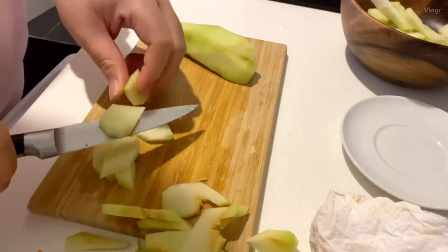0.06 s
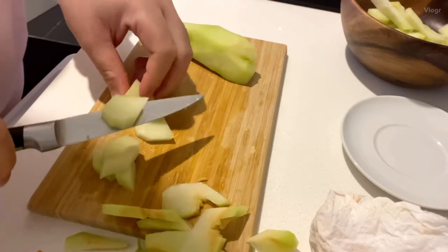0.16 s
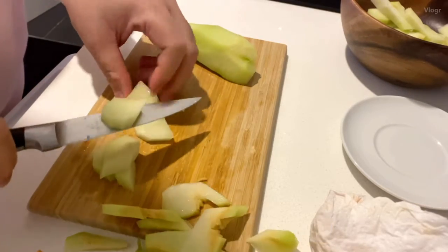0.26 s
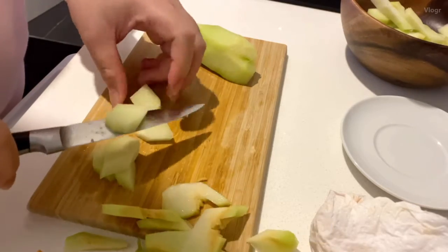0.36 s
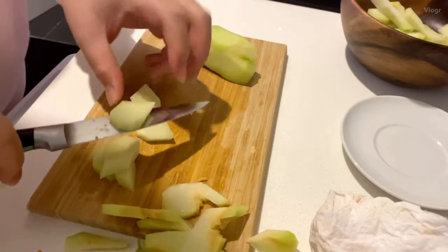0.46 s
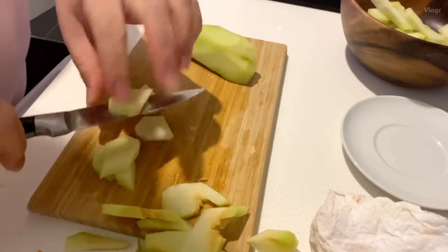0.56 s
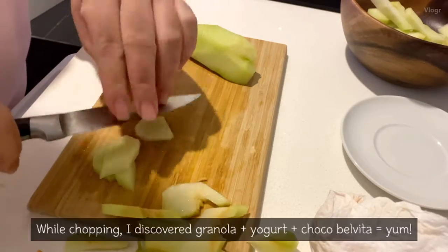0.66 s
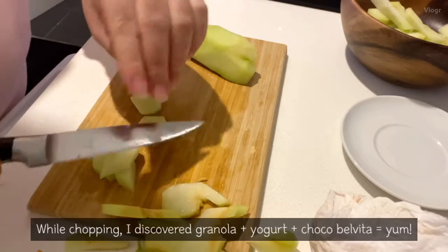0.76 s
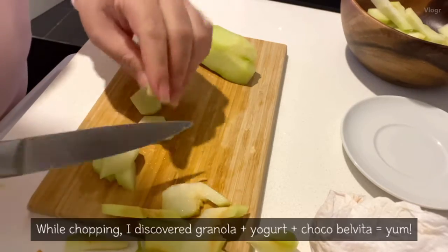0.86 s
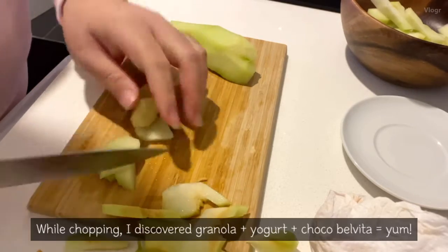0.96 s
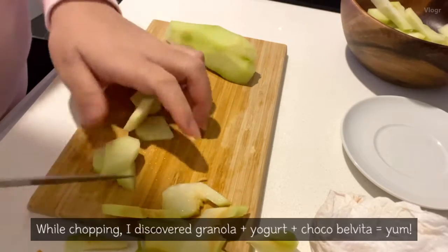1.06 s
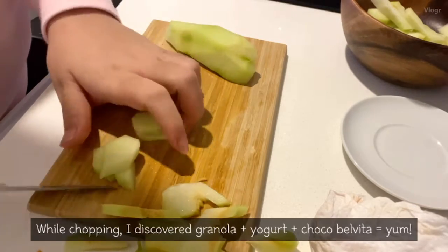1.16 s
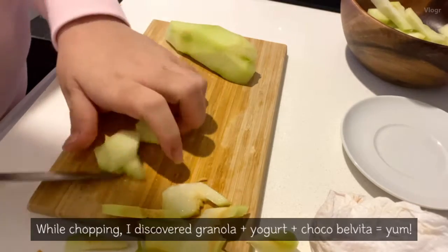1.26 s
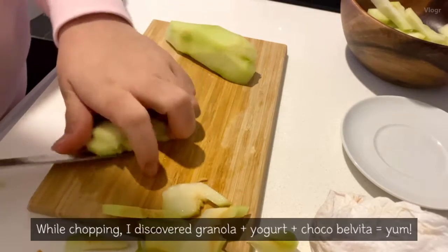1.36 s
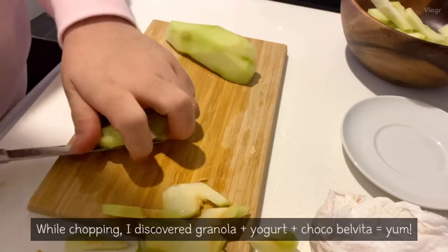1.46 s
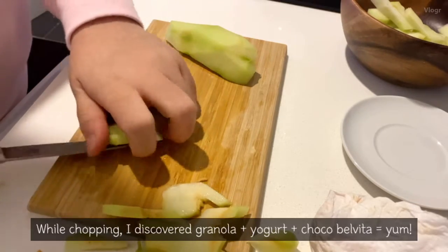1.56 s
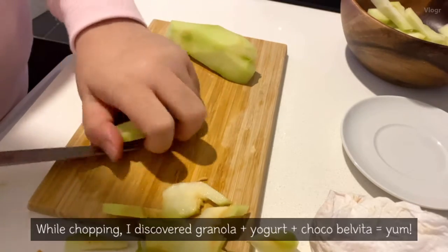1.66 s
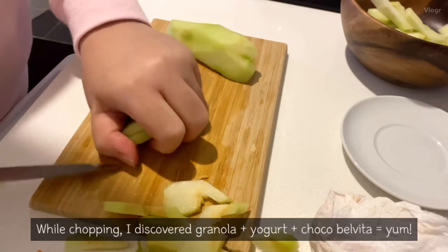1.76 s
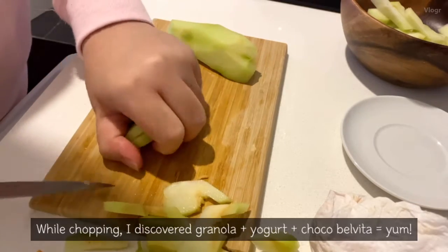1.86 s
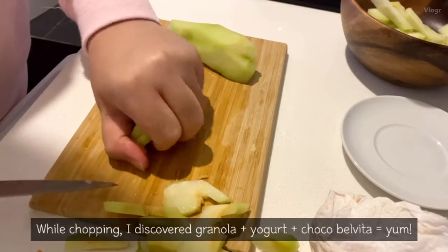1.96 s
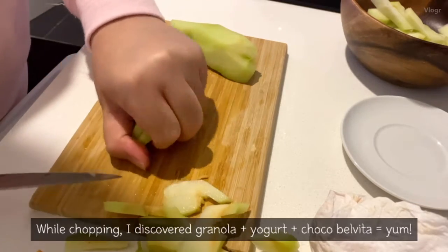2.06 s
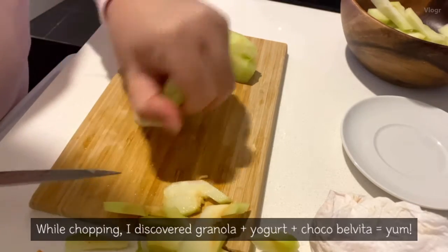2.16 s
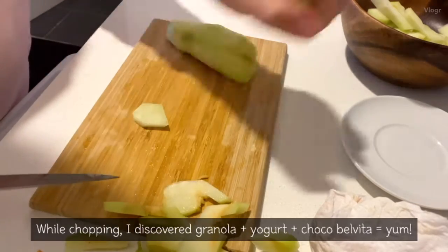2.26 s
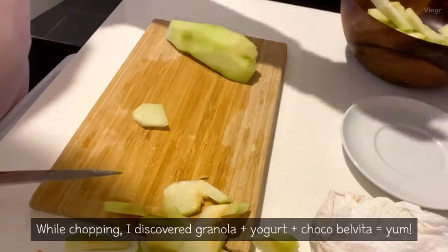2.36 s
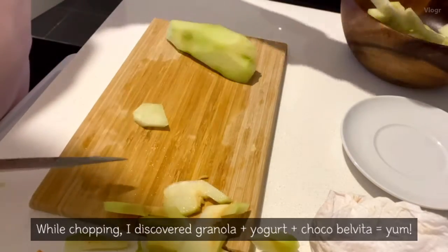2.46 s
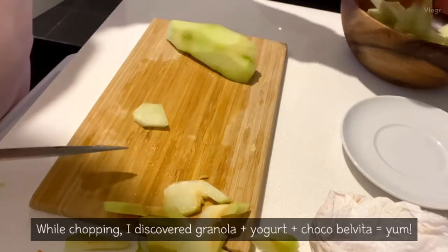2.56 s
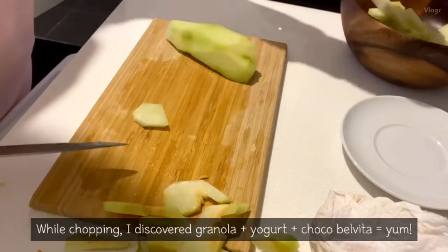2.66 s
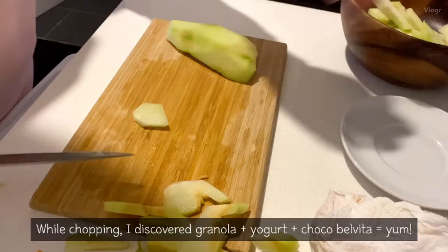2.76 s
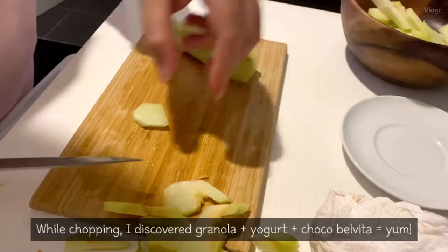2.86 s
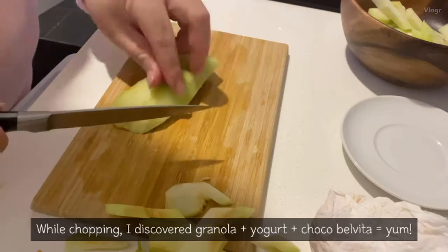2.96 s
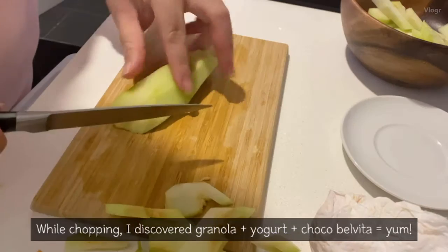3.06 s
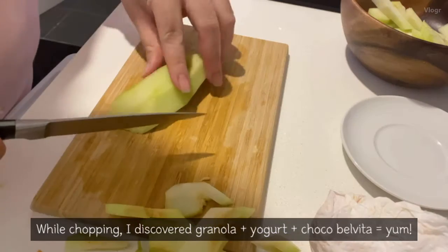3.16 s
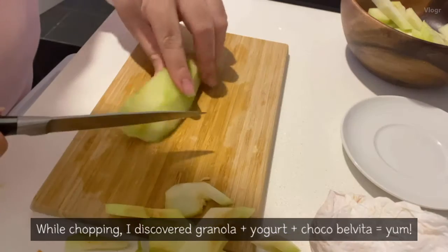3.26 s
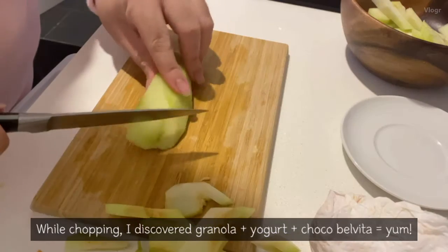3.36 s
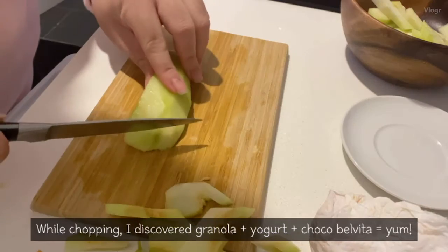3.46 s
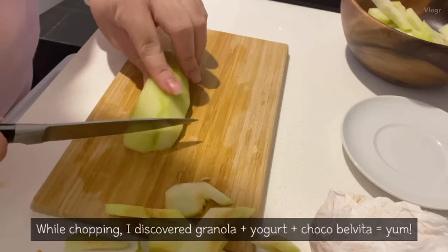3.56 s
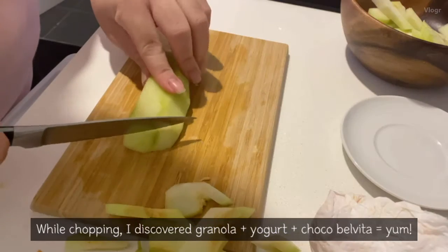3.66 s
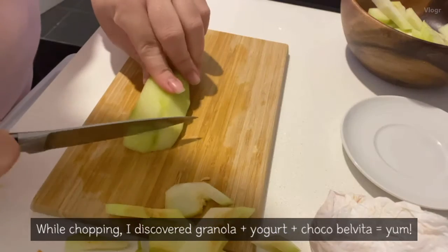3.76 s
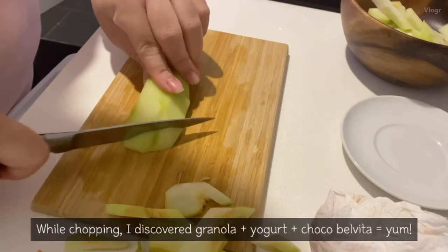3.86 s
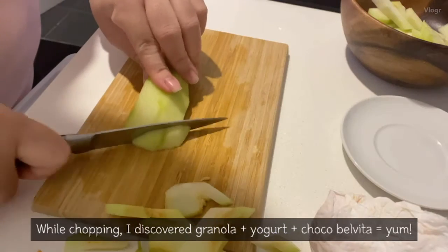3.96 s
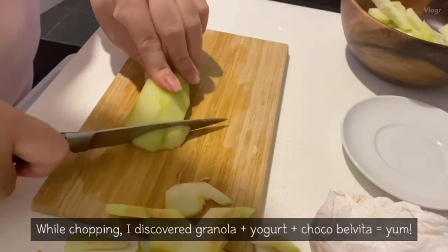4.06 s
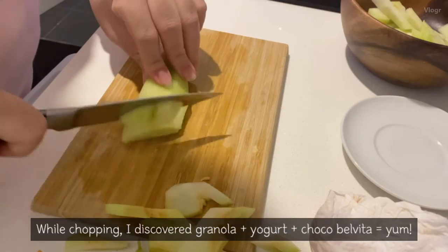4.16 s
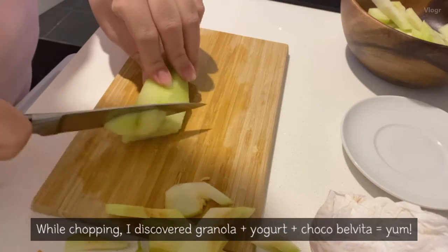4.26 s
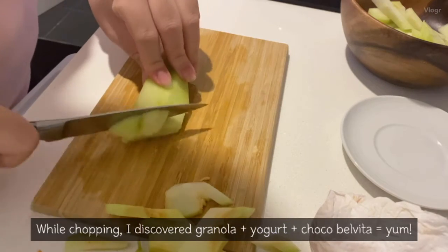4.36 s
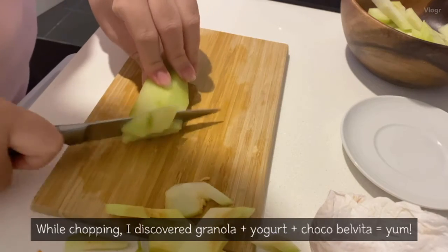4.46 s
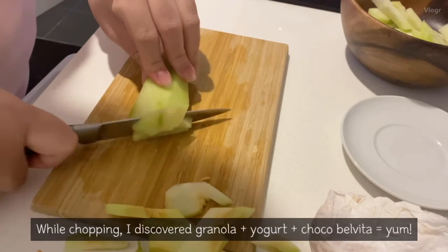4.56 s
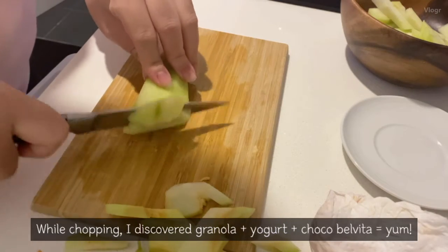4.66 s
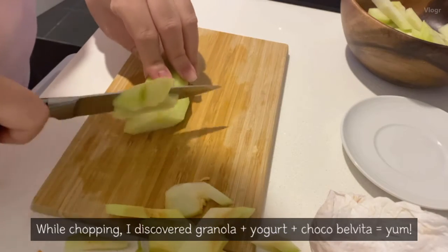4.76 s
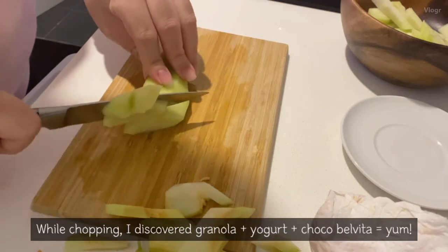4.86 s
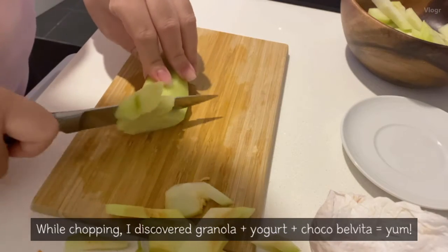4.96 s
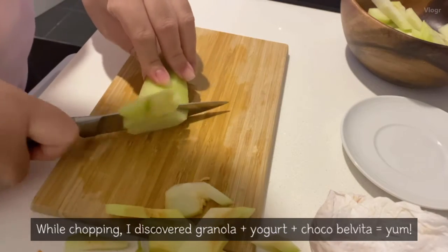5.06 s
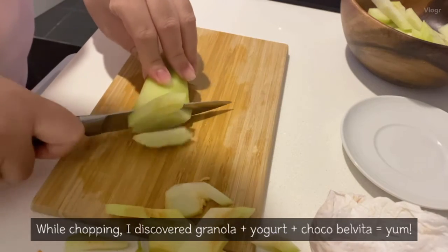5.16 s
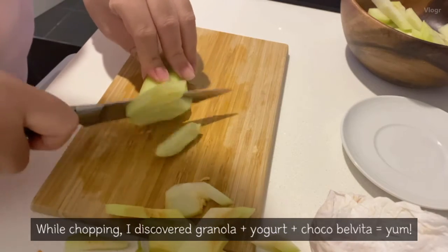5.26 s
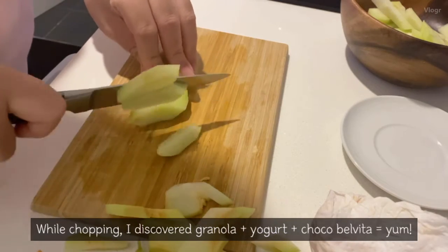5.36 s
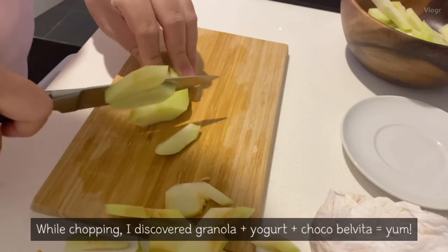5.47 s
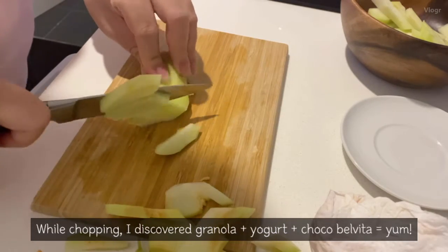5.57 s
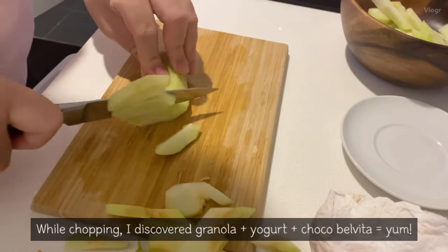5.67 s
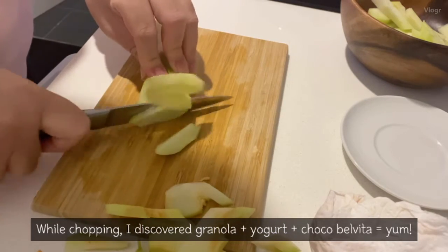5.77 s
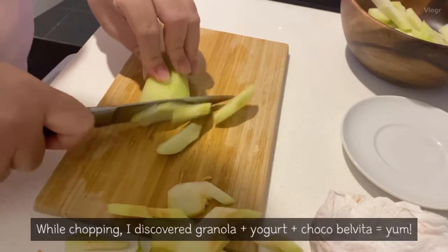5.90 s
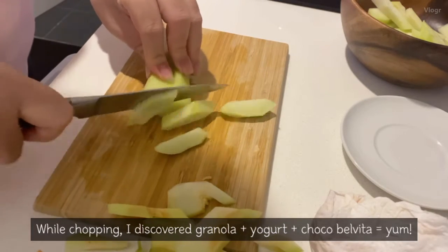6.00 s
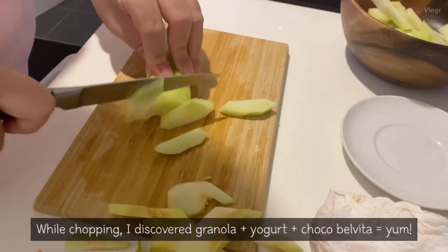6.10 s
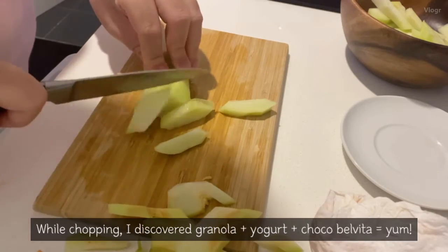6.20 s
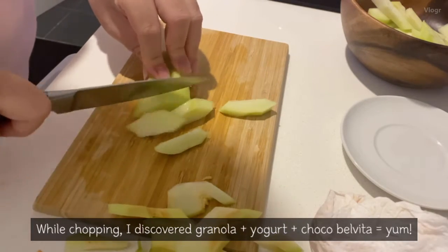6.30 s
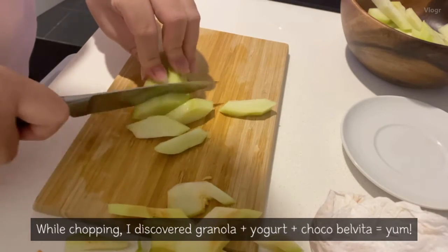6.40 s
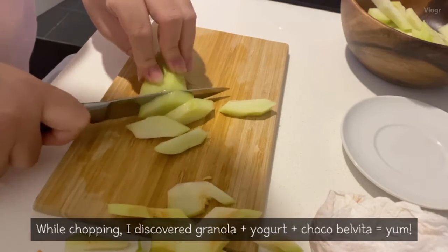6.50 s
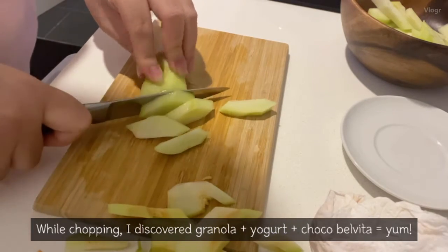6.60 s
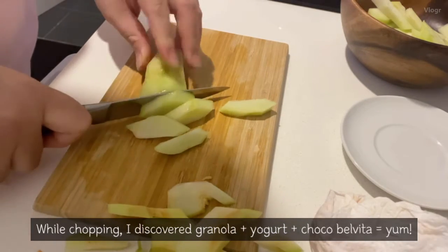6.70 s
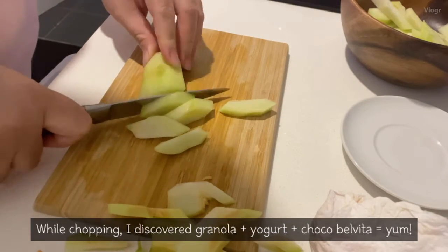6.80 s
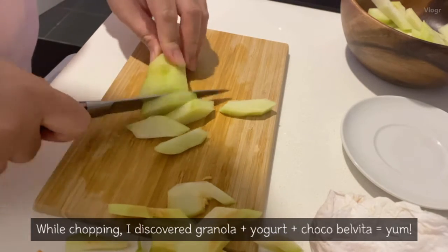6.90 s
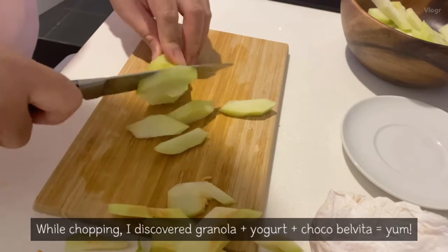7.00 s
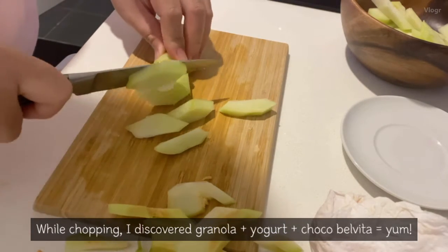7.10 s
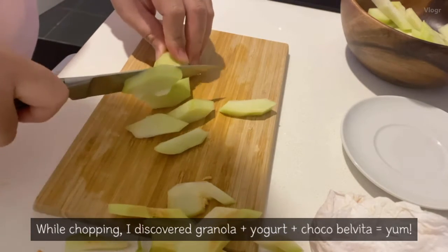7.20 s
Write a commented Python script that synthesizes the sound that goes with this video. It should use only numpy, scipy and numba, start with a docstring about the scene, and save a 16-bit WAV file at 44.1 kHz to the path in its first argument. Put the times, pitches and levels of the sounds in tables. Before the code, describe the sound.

Nearly three seconds of quiet handling, with moist rustles, finger and blade ticks and gentle board knocks, give way to slicing. Five bright, hard knife strikes on bamboo follow, the first loudest, each preceded by a brief juicy crunch and often a dull board thump. Small pieces tap and slide in between. Close microphones, short kitchen reverberation, low house hum and thin air noise.

```python
"""Slicing squash in a small kitchen

A knife slices firm squash on a bamboo board; hands move the wet pieces between cuts.
Each cut is a thump of the board, a crunchy slide and a chop: forces excite damped modes, and friction
is filtered crackle. Hard walls answer with decaying noise, over a low hum, a motor and thin air noise.
Two microphone ports hear the board with different phase and level at each pitch."""
import sys
import numpy as np
from scipy import signal
from scipy.fft import rfft, irfft
from scipy.io import wavfile
from scipy.ndimage import uniform_filter1d
from numba import njit

SR = 44100
rng = np.random.default_rng(int(sys.argv[2]) if len(sys.argv) > 2 else 0)


def persist_wave(psi):
    """Save psi, clipped to +-1, as 16-bit WAV."""
    counts = np.round(np.clip(psi, -1, 1) * 32767).astype(np.int16)
    wavfile.write(sys.argv[1], SR, np.atleast_2d(counts).T)


N = 319284  # samples


def undb(db):
    """Level: amplitude ratio of a value in dB."""
    return 10 ** (np.asarray(db) / 20)


def unit(x):
    """Normalization: scale to an effective (RMS) value of 1."""
    return x / np.sqrt(np.mean(x ** 2))


def band(x, lo_hz, hi_hz):
    """Band-pass filtering between two corner frequencies."""
    sos = signal.butter(2, [lo_hz, min(hi_hz, .49 * SR)], "band", fs=SR, output="sos")
    return signal.sosfilt(sos, x)


@njit
def svf(x, hz, k):
    """Resonance: state-variable band-pass with a moving centre and relative width k."""
    y, b, l = np.empty(len(x)), 0., 0.
    for i in range(len(x)):
        g = np.tan(np.pi * hz[i] / SR)
        v = (b + g * (x[i] - l)) / (1 + g * (g + k))
        b, l, y[i] = 2 * v - b, l + 2 * g * v, k * v
    return y


def ring(hz, t60, length=.25):
    """Free vibration: one mode decays exponentially, by 60 dB in t60 s."""
    t = np.arange(int(length * SR)) / SR
    return np.sin(2 * np.pi * hz * t) * np.exp(-np.log(1000) * t / max(t60, .003))


def thud(hz, t60, push=.022):
    """Forced vibration: a soft push lasting push s drives one low mode; peak 1."""
    n = int(push * SR)
    force = np.hanning(n) * np.sin(2 * np.pi * hz * np.arange(n) / SR)
    x = np.convolve(ring(hz, t60), force)
    return x / np.abs(x).max()


def burst(decay):
    """Random excitation: noise that falls to 1/e in decay s."""
    t = np.arange(int(.12 * SR)) / SR
    return rng.standard_normal(len(t)) * np.exp(-t / decay)


def crackle(rate, scatter_db, hiss):
    """Shot noise: cells burst as clicks of uneven size, rate per s, over a fine hiss."""
    size = undb(scatter_db * rng.standard_normal(N)) * rng.standard_normal(N)
    clicks = size * (rng.random(N) < rate / SR)
    return unit(clicks) + hiss * rng.standard_normal(N)


def walk(rate):
    """Random modulation: levels held 1 / rate s and smoothed twice; spread near 1."""
    hold = int(SR / rate)
    steps = np.repeat(rng.standard_normal(N // hold + 1), hold)
    return 1.3 * uniform_filter1d(uniform_filter1d(steps, hold), hold)[:N]


def span(start, length, fade):
    """Envelope: a gate that opens and closes linearly over fade s."""
    t = np.arange(N) / SR
    return np.clip(np.minimum(t - start, start + length + fade - t) / fade, 0, 1)


def add(out, s, x):
    """Superposition: add x to out from time s on."""
    i = int(s * SR)
    x = x[..., :out.shape[-1] - i]
    out[..., i:i + x.shape[-1]] += x


# Blade landing on the board: t/s, peak level/dB, brightness/(dB per octave),
# second contact level/dB, counter thud level/dB
BLADE_LANDINGS = [(3.818, -0.5, 5.6, 3, -17), (4.392, -4.5, -1.7, -1.5, -18), (4.967, -10.5, -5.8, -1, -15),
                  (5.688, -8, -0.3, 4, -14), (6.384, -6.5, 1.5, 0, -14)]
# Modes of the board: f/Hz, relative level/dB, t60/s
BOARD_MODES = [(467, -11, .06), (760, -10, 0.025), (995, -18.5, .03), (1150, -5, .025), (1330, -4, 0.013),
               (1448, -12.5, 0.041), (1585, -4, 0.035), (1768, -11, .025), (1870, 5, .04), (2133, 0, 0.051),
               (2332, -3.5, 0.047), (2492, -1, .02), (2764, -14, .03), (3020, -11, 0.046),
               (3294, -13.5, 0.046), (3630, -5.5, 0.014), (3800, -7, 0.025), (4070, -11.5, 0.018),
               (4423, -17.5, 0.0088), (5494, -17, .012), (5787, -18, 0.007), (6830, -19.5, .01)]
SECOND_CONTACT_S = 0.0026  # belly lands this long after the heel
COUNTER_HZ, COUNTER_DB = 255, -3  # second mode of the counter thud


def chops():
    """Modal excitation: heel and belly strike the board in turn; also the bare knock the walls hear."""
    out, knocks = np.zeros(N), np.zeros(N)
    for s, db, tilt_db, second_db, thud_db in BLADE_LANDINGS:
        force = 0.042 * burst(0.0084)
        force[0] += 1
        force[int(SECOND_CONTACT_S * SR)] += undb(second_db)

        # each blow scatters the modes a little in level and pitch
        scatter = 2.5 * rng.standard_normal((len(BOARD_MODES), 2))
        modes = 0
        for k, ((f, g, t60), (a, b)) in enumerate(zip(BOARD_MODES, scatter)):
            level = undb(g + tilt_db * np.log2(max(f, 1000) / 2000) + a)
            modes = modes + level * (-1) ** k * ring(f * (1 + .003 * b), t60, length=0.18)
        blow = signal.fftconvolve(force, modes)
        blow /= np.abs(blow).max()

        # the many dense modes between the strong ones blur into a knock
        click = signal.unit_impulse(2000)
        knock = band(click, 1650, 2500) - undb(-8) * band(click, 1200, 1600)
        knock += undb(-16) * band(click, 340, 1500)
        knock -= undb(-5.5 + tilt_db) * band(click, 3300, 4500)
        knock += undb(-11 + tilt_db / 2) * band(click, 5200, 7200)
        knock -= undb(-26) * band(click, 8000, 15000)
        knock /= np.abs(knock).max()

        add(blow, 0, undb(-4.0) * signal.fftconvolve(force, knock))
        add(blow, .005, undb(thud_db) * thud(155, 0.066, push=0.0072))
        add(blow, .005, undb(thud_db + COUNTER_DB) * thud(COUNTER_HZ, 0.05, push=0.004))
        add(out, s + .001, undb(db) * blow / np.abs(blow).max())
        add(knocks, s, undb(db) * knock)
    return out, knocks


# Bands in which the blade sings faintly: f/Hz, width/Hz, relative level/dB
BLADE_SONG = [(3260, 150, -3.5), (3900, 90, -7), (4800, 170, -0.5), (5220, 150, -5), (6300, 410, -12),
              (7140, 150, 1), (11500, 2700, -6.5)]


def blade_bands(x):
    """Parallel resonances: the blade's bands come and go as its grip changes."""
    total = 0
    for f, width, g in BLADE_SONG:
        level = undb(g + 3 * walk(12))
        total = total + level * unit(svf(x, np.full(N, 1. * f), width / f))
    return unit(total)


def board_noise(x):
    """Structure-borne sound: friction heard through the lower modes of the board."""
    total = 2.0 * unit(band(x, 460, 3400))
    for f, g, _ in BOARD_MODES[:10]:
        level = undb(g / 2 + 2.4 * walk(12))
        total = total + level * unit(svf(x, np.full(N, 1. * f), 0.055))
    return unit(total)


# Blade through the flesh: edge touches t/s, enters t/s, skin snaps t/s, flesh parts t/s, graze level/dB,
# steady crunch level/dB, snap level/dB, last tear level/dB, board rumble re steady crunch level/dB
CUTS = [(3.59, 3.648, 3.704, 3.816, -59, -54, -47, -42, -4),
        (4.185, 4.243, 4.28, 4.39, -65, -50.5, -41, -35, -4),
        (4.728, 4.792, 4.803, 4.964, -63, -51, -49, -39, -3),
        (5.435, 5.49, 5.64, 5.686, -70, -56, -54, -37, -1),
        (6.15, 6.245, 6.258, 6.383, -59, -56, -56, -39, -3),
        (7.09, 7.148, 7.22, 7.3, -74, -61, -54, -50, -7)]
ENTER_S, LET_GO_S = .012, .018  # the crunch builds; the halves slide off the blade
GRAZE_RISE_DB_PER_S, SNAP_RISE_S, SNAP_FALL_S = 170, .007, .014
TEAR_S, TEAR_RUMBLE_DB = .017, -13  # swell before the flesh parts; its rumble in the board
CRUNCH_FIZZ_DB, TEAR_FIZZ_DB = -1, -5  # fizz near and above 9 kHz


def slices():
    """Fracture noise: crisp flesh gives a graze, a steady crunch with a snap in it, and a last tear."""
    t = np.arange(N) / SR
    crunch, rumble, fizz = np.zeros((3, N))
    for touch, enter, snap, part, graze_db, steady_db, snap_db, tear_db, rumble_db in CUTS:
        gate = np.clip((t - touch) / .005, 0, 1) * np.exp(-np.maximum(t - part, 0) / LET_GO_S)
        push_levels = [graze_db - GRAZE_RISE_DB_PER_S, graze_db, steady_db]
        push = undb(np.interp(t, [enter - 1, enter, enter + ENTER_S], push_levels))
        peak = undb(snap_db) * np.exp(-np.abs(t - snap) / np.where(t < snap, SNAP_RISE_S, SNAP_FALL_S))
        tear = undb(tear_db) * np.exp(np.minimum(t - part, 0) / TEAR_S)
        crunch += gate * np.sqrt(push ** 2 + peak ** 2 + tear ** 2)
        fizz += gate * np.hypot(push * undb(CRUNCH_FIZZ_DB), (peak + tear) * undb(TEAR_FIZZ_DB))
        rumble += gate * (push * undb(rumble_db) + tear * undb(TEAR_RUMBLE_DB))

    x = crackle(1800, 4.0, 1.0)
    mid = unit(unit(band(x, 1800, 8080)) + .5 * blade_bands(x))
    mix = crunch * mid + rumble * board_noise(x) + fizz * unit(band(x, 8800, 14000))
    return undb(2.5 * walk(70)) * mix


# Wet pieces rubbing on board, blade and fingers: start t/s, length t/s, first level/dB, last level/dB, relative
# level under 2 kHz /dB, relative level above 9 kHz /dB, squeak f/Hz (held until a later row starts)
STROKES = [(0.58, .05, -84, -96, 5, 18, 4300), (0.898, .16, -66, -78, 4, -8, 4200),
           (1.075, .12, -62, -62, 6, -12, 3400), (1.2, .12, -58, -53, -2, -7, 4900),
           (1.33, .2, -58, -68, 2, -6, 4100), (1.535, .12, -54, -51, -22, -12, 3450),
           (1.665, .105, -55, -58, -10, -9, 4300), (1.852, .1, -62, -77, -2, -5, 4300),
           (2.478, .1, -68, -77, -6, -7, 3700), (3.14, .11, -72, -67, 0, -4, 3600),
           (5.84, .12, -72, -80, 4, 2, 2800), (5.09, .05, -76, -76, -5, 3, 5200),
           (5.97, .08, -66, -74, -4, 2, 4000), (6.69, .15, -68, -75, -1, 0, 3700)]
RUB_ATTACK_S, RUB_RELEASE_DB_PER_S = .014, 420


def rubs():
    """Stick-slip friction: crackle in a squeaky band and in the blade's bands; each row's squeak pitch holds
    from its start until the start of a later-listed row."""
    t, hz = np.arange(N) / SR, np.full(N, 4000.)
    rustle, low, high = np.zeros((3, N))
    for start, length, first_db, last_db, low_db, high_db, bright_hz in STROKES:
        times = [start, start + length, start + length + 1]
        db = np.interp(t, times, [first_db, last_db, last_db - RUB_RELEASE_DB_PER_S])
        stroke = undb(db) * np.clip((t - start) / RUB_ATTACK_S, 0, 1)
        rustle += stroke
        low += undb(low_db) * stroke
        high += undb(high_db) * stroke
        hz[t > start] = bright_hz

    x = crackle(1200, 2.5, 1.2)
    squeak = unit(svf(x, hz * (1 + .03 * walk(15)), .05))
    mid = unit(unit(band(x, 1640, 8500)) + 0.8 * squeak + 0.7 * blade_bands(x))
    mix = rustle * mid + low * board_noise(x) + high * unit(band(x, 8050, 11700))
    return undb(2.8 * walk(50)) * mix


# Board rocking on the counter under hand or blade: t/s, peak level/dB, f/Hz, upper ring relative level/dB
BOARD_ROCKS = [(0.225, -36, 146, -13), (0.888, -32.5, 152, -20), (1.08, -27.5, 143, -10),
               (1.262, -32.5, 133, -24), (1.337, -36, 155, -19), (1.396, -38, 152, -12),
               (2.502, -40, 139, 3), (2.52, -46, 260, -2), (2.575, -46, 300, 0), (3.082, -38, 128, -15),
               (3.17, -37, 137, -18.5), (3.199, -35, 139.5, -21), (3.71, -31.5, 167, -22.5),
               (4.185, -21, 142, -40), (4.224, -34.5, 136, -32.5), (4.261, -29.5, 141, -26.5),
               (4.294, -33.5, 127, -19.5), (4.731, -31, 127, -24), (5.084, -29.5, 153, -10),
               (5.437, -20.5, 140, -28), (5.489, -34.5, 119.5, -13), (5.771, -31.5, 148, -7.5),
               (5.84, -30, 147, -8.5), (6.099, -37.5, 139, -24), (6.157, -18.5, 148.5, -27),
               (6.198, -34, 121, -23), (7.199, -37.5, 135, -17)]
THUMP_T60_S, THUMP_DAMP_S_PER_DB = .018, .0015  # ring of a -20 dB thump; a lighter press damps less


def thumps():
    """Mass-spring bounce: the board rocks on the counter, with its first mode ringing above."""
    low, upper = np.zeros((2, N))
    for s, db, hz, upper_db in BOARD_ROCKS:
        t60 = THUMP_T60_S + THUMP_DAMP_S_PER_DB * (-20 - db)
        add(low, s - .004, undb(db) * thud(hz, t60))
        add(upper, s - .004, undb(db + upper_db) * thud(BOARD_MODES[0][0], 0.045, push=0.0038))
    return low, upper


# Pieces, fingers and blade touching wood: t/s, peak level/dB, strongest f/Hz,
# level of the tick above 4 kHz /dB, left minus right level/dB
TOUCHES = [(0.219, -39, 1200, -58, 0), (0.255, -60, 870, -64, 0), (0.459, -66, 634, -72, 0),
           (0.581, -66, 875, -52, -1), (0.903, -45.5, 1410, -73, 0), (0.986, -52, 855, -74, -3),
           (1.029, -52, 1250, -73, -1), (1.073, -31, 1810, -43, 6), (1.139, -38.5, 1580, -53, 1),
           (1.2, -46, 1610, -56, 1), (1.332, -40, 1180, -51, 0), (1.674, -43, 4800, -46, -1),
           (1.855, -55, 4340, -58, 0), (2.073, -41, 1500, -58, 1), (2.479, -46, 840, -68, 6),
           (2.514, -37, 970, -61, -4.5), (2.539, -49, 885, -77, -2), (2.564, -47.5, 1010, -82, -5),
           (2.584, -50, 810, -78, -8), (3.076, -54, 2300, -60, 1), (3.229, -52.5, 1100, -74, -1),
           (3.459, -62, 845, -62.5, -6.5), (3.65, -51, 1210, -58, 3), (4.088, -55.5, 2260, -70, 4.5),
           (4.178, -65, 620, -53, -1), (4.253, -48, 1154, -44.5, 3), (4.724, -54, 870, -51.5, 0),
           (4.799, -47, 3060, -52, -1), (5.081, -32.5, 1138, -62.5, 2), (5.167, -41, 1137, -80, 1),
           (5.21, -53, 1147, -80, 9), (5.43, -64, 749, -60, -10), (5.499, -62, 632, -66, -4),
           (6.033, -62.5, 607, -60, -5), (6.149, -60, 597, -57, 0), (6.739, -59.5, 1275, -54.5, 1)]
TAP_T60_S = .055


def taps():
    """Damped resonance: a short soft chatter excites each small knock, with a high tick on top."""
    out = np.zeros((2, N))
    for s, db, hz, tick_db, pan_db in TOUCHES:
        force = burst(TAP_T60_S / np.log(1000))
        force *= np.clip(np.arange(len(force)) / SR / 0.00033, 0, 1)  # soft onset
        knock = band(band(force, 0.48 * hz, 1.4 * hz), .3 * hz, 2.7 * hz)
        knock = unit(knock) + 0.8 * unit(svf(knock, np.full(len(force), 1. * hz), 0.11))
        knock *= undb(db) / np.abs(knock).max()
        knock += undb(tick_db) * 1.3 * band(band(burst(0.004), 4500, 17000), 4500, 17000)
        add(out, s - .001, knock * undb(np.array([[pan_db], [-pan_db]]) / 2))
    return out


# Reverberation of the room: f/Hz, t60/s, relative level/dB
ROOM_BANDS = [(194, 0.38, -21), (433, 0.48, -16.5), (926, 0.29, -20.5), (2115, 0.49, -28.5),
              (3770, 0.24, -32.5), (8000, 0.65, -40), (12740, 0.16, -21)]
EARLY_T60_S, EARLY_DB = 0.11, 7  # counter and tiles close by, relative to the walls


def kitchen(x):
    """Diffuse reverberation: near surfaces, then walls, answer independently at each port."""
    t = np.arange(int(.7 * SR)) / SR
    tail = 0
    for hz, t60, db in ROOM_BANDS:
        decay = undb(db - 60 * t / t60) + undb(db + EARLY_DB - 60 * t / EARLY_T60_S)
        noise = rng.standard_normal((2, len(t)))
        tail = tail + decay * np.array([unit(band(v, hz / 1.5, hz * 1.557)) for v in noise])
    tail = tail * np.clip((t - .004) / 0.0022, 0, 1)  # silent until the first reflection
    return signal.fftconvolve(x[None], undb(-26.5) * tail)[:, :N]


# Phase by which the left port leads: f/Hz, phase/rad
LEFT_LEAD = [(0, 7), (160, -2.12), (300, -1.88), (600, -2.5), (1120, -1.2), (1460, 1.66), (3190, 1.16),
             (5500, 1.5), (16000, 2.12)]
# Level difference of the ports: f/Hz, left minus right level/dB
LEFT_EXCESS = [(60, 1.5), (110, 0), (200, -5), (380, 16), (700, 2.5), (1290, 3.5), (2380, 2), (4400, 3.5),
               (8120, -0.5), (15000, 1.5)]


def ports(x):
    """Interchannel transfer: sound reaches the two ports with another phase and level at each pitch."""
    hz = np.arange(N // 2 + 1) * SR / N
    phase, db = (np.interp(hz, *np.transpose(table)) for table in (LEFT_LEAD, LEFT_EXCESS))
    left = undb(db / 2) * np.exp(.5j * phase)
    return irfft(rfft(x) * np.array([left, 1 / left]), N)


# Low sound of the house: t/s, rumble near 60 Hz level/dB, counter drone near 130 Hz level/dB
HOUSE_LEVELS = [(0.0, -56, -63), (0.2, -50, -58), (0.56, -54, -63), (0.95, -47, -55), (1.2, -50, -46),
                (1.45, -51, -51), (1.69, -54, -62), (2.35, -50, -62), (2.62, -52, -58), (2.9, -55, -61),
                (3.85, -53, -54), (4.65, -51, -63), (4.85, -49, -47), (5.2, -52, -51), (5.38, -57, -63),
                (5.7, -51, -49), (6.09, -52, -55), (6.35, -49, -46), (6.6, -54, -55), (7.24, -57, -51)]
# Swells of the motor's harmonics: start t/s, length t/s, second harmonic level/dB, fourth harmonic level/dB
MOTOR_SWELLS = [(4.7, .6, -60, -57), (5.45, .9, -60, -62), (6.45, .3, -56, -60), (6.78, .4, -54, -57)]
# Spectrum of the air noise: f/Hz, relative spectral level/dB
AIR_SPECTRUM = [(120, -14.5), (200, -6), (482, -11.5), (538, -27.5), (916, -16.5), (2130, -43), (5130, -42),
                (8740, -54), (9750, -44), (16000, -45)]
HUM_WAVER_DB, DRONE_WAVER_DB = 2, 3
MOTOR_ON_S, MAINS_HZ, MOTOR_DB = 3.0, 60.5, -53
AIR_DB, AIR_STEP_DB = -68, 3  # level before the mix; the air noise is louder once the motor runs


def house():
    """Background noise: a wavering hum, a drone in the counter, a motor with its buzz, and thin air noise."""
    t = np.arange(N) / SR
    s, *columns = np.transpose(HOUSE_LEVELS)
    hum_db, drone_db = (np.interp(t, s, c) for c in columns)
    noise = rng.standard_normal((7, N))

    hum = unit(svf(noise[0], np.full(N, MAINS_HZ), 0.033)) + 1.7 * unit(band(noise[1], 36, 95))
    hum = unit(hum) * undb(hum_db + HUM_WAVER_DB * walk(6))
    drone = unit(band(noise[2], 87, 166.8)) * undb(drone_db + DRONE_WAVER_DB * walk(6))

    # a fridge motor fades in over 0.8 s and adds a mains tone that wavers slightly
    motor = undb(MOTOR_DB + 2.2 * walk(3)) * np.clip((t - MOTOR_ON_S) / .8, 0, 1)
    motor *= np.sqrt(2) * np.sin(2 * np.pi * MAINS_HZ * t)
    second_swell = sum(undb(db) * span(a, length, .08) for a, length, db, _ in MOTOR_SWELLS)
    second = second_swell * np.sin(4 * np.pi * MAINS_HZ * t)
    fourth_swell = sum(undb(db) * span(a, length, .08) for a, length, _, db in MOTOR_SWELLS)
    buzz = fourth_swell * unit(svf(noise[3], np.full(N, 239.), .02))

    hz = np.maximum(np.arange(N // 2 + 1) * SR / N, 1)
    air_hz, air_colour_db = np.transpose(AIR_SPECTRUM)
    colour = undb(np.interp(np.log(hz), np.log(air_hz), air_colour_db))
    air = unit(irfft(rfft(noise[4:]) * colour * (hz > 130), N))
    air *= undb(AIR_DB + AIR_STEP_DB * np.clip(t - MOTOR_ON_S, 0, 1) + 0.93 * walk(1.8))

    # part of the air noise is shared by the ports, the rest is independent at each
    return hum + motor + drone + second + ports(buzz + 0.43 * air[0]) + 0.96 * air[1:]


def scene():
    """Superposition of direct sound, reverberation and background."""
    blows, knocks = chops()
    friction = slices() + rubs()
    small = taps()
    low, upper = thumps()
    to_walls = 2.6 * knocks + .6 * friction + .6 * small.mean(axis=0) + 0.27 * low + .5 * upper
    return ports(blows + friction + small + upper) + low + kitchen(to_walls) + house()


# Span in which the sound stops briefly: start t/s, end t/s
SILENCE_S = (2.907, 2.945)
SAME_BASS_HZ, TOP_HZ = 190, 16100  # below the first both ports feel the same pressure


def record(dry):
    """Pressure pickup: the ports share their bass, the sound stops briefly, a low-pass cuts the top."""
    mid = dry.mean(axis=0)
    high_pass = signal.butter(1, SAME_BASS_HZ, "high", fs=SR, output="sos")
    side = signal.sosfiltfilt(high_pass, dry - mid)
    t = np.arange(N) / SR
    away = np.maximum(SILENCE_S[0] - t, t - SILENCE_S[1])
    gate = np.clip(away / 0.023 + 0.56, 0, 1) * (away > 0)  # a short fade to 0.56, then silence
    low_pass = signal.ellip(8, .2, 70, TOP_HZ, fs=SR, output="sos")
    return signal.sosfilt(low_pass, (mid + side) * gate)


dry = scene()
out = record(dry)
persist_wave(out)
```